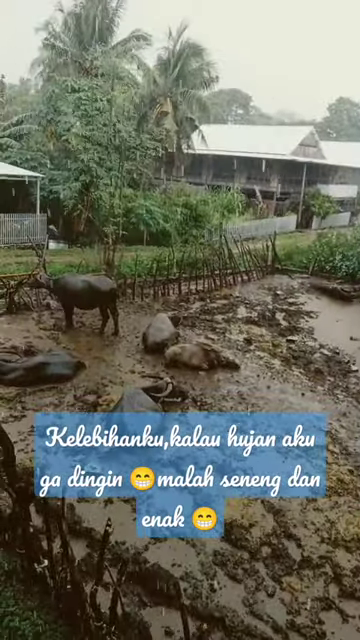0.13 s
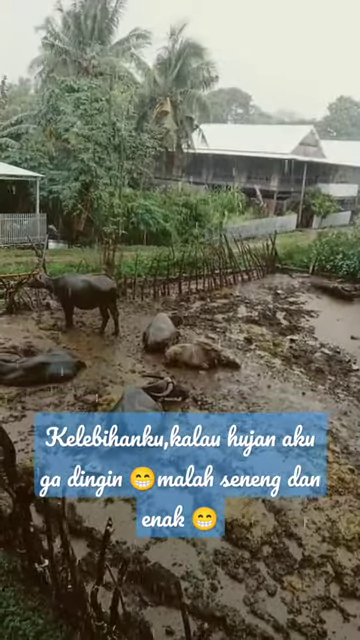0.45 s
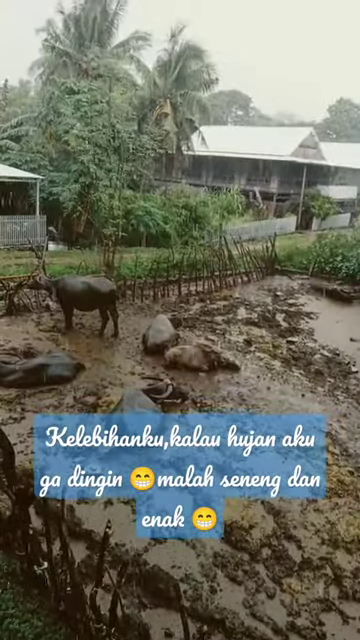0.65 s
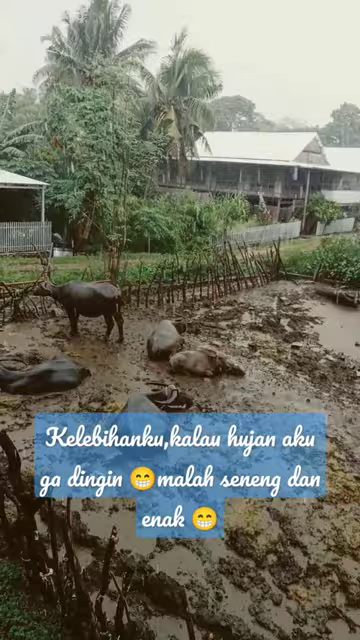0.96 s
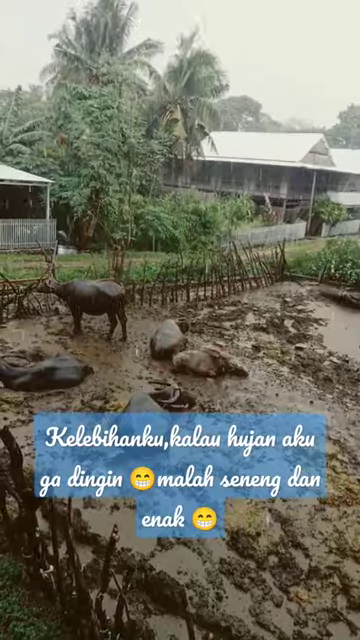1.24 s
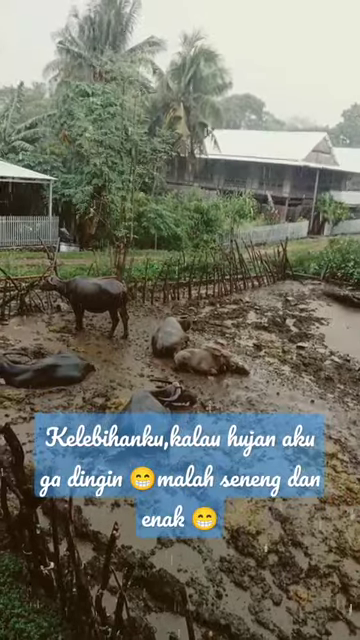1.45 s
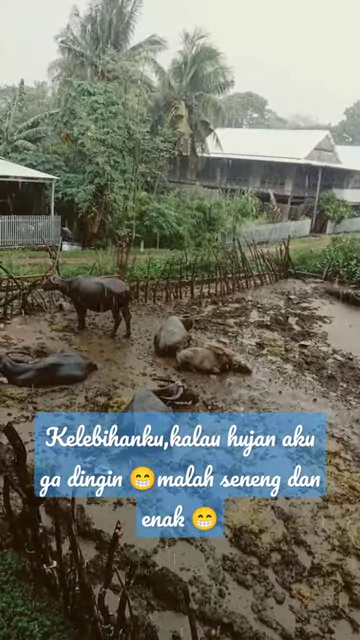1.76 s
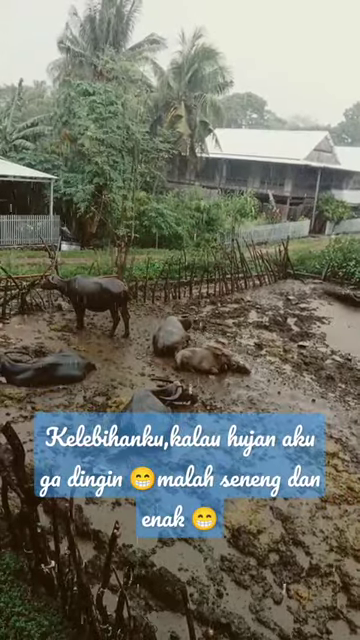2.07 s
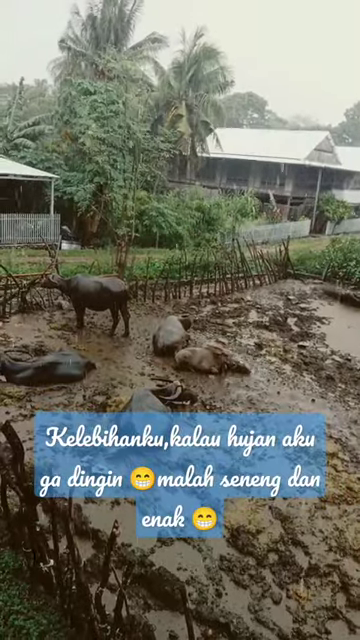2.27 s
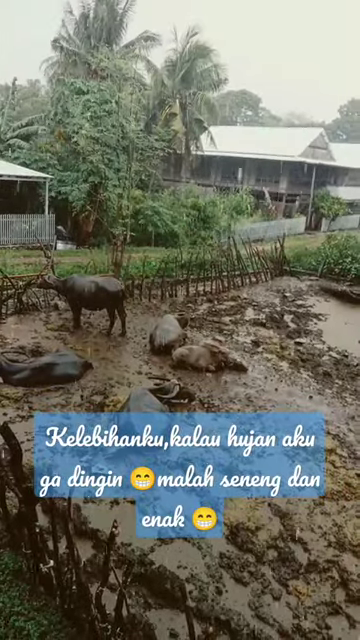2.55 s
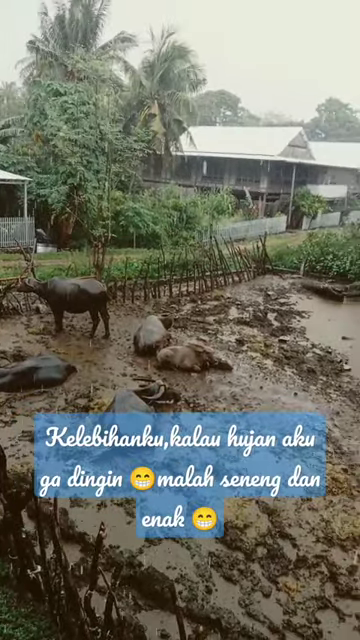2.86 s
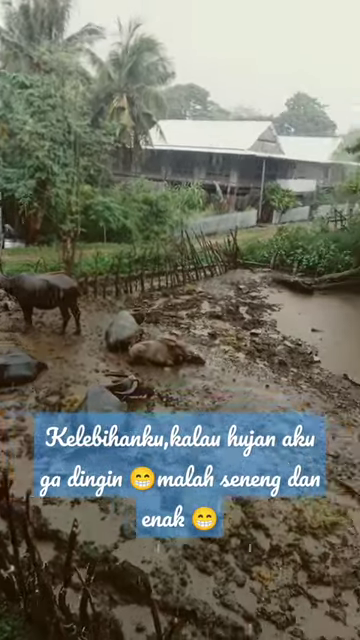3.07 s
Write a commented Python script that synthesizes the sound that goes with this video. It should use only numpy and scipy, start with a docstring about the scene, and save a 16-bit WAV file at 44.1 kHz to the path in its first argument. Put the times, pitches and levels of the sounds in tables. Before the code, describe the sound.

A steady downpour hisses over muddy ground, standing water and foliage outdoors. Throughout, big drips plop at uneven intervals near the sheltered phone microphone, along with an occasional sharper spatter.

```python
"""A steady wash of heavy rain on mud, puddles and leaves, heard from a shelter on a mono phone.
Countless far drops merge into the wash; nearer ones splash and ring as bubbles. These share one
colour, with a narrow ring near 1.26 kHz and a bright hump near 6.5 kHz.
Close by, fat drips thud dully and single drops spatter."""
import sys
import numpy as np
from scipy import signal
from scipy.fft import rfft, irfft, next_fast_len
from scipy.io import wavfile
from scipy.ndimage import uniform_filter1d

SR = 44100
rng = np.random.default_rng(int(sys.argv[2]) if len(sys.argv) > 2 else 0)


def store_wav(level_fs):
    """Save 16-bit WAV to argv[1]."""
    pcm = np.round(np.clip(np.atleast_2d(level_fs), -1, 1) * 32767)
    wavfile.write(sys.argv[1], SR, pcm.T.astype(np.int16))


N = 141561


def undb(db):
    return 10 ** (np.asarray(db) / 20)


def set_rms(x, db):
    return x * undb(db) / np.sqrt(np.mean(x ** 2))


def shaped(x, gain):
    """Filter x by gain(hz)."""
    size = next_fast_len(len(x) + 4096)
    hz = np.maximum(np.arange(size // 2 + 1) * SR / size, 1)
    return irfft(rfft(x, size) * gain(hz), size)[:len(x)]


def drift(per_s):
    """Smooth random drift, rms 1."""
    hold = int(SR / per_s)
    steps = np.repeat(rng.standard_normal(N // hold + 2), hold)
    return set_rms(uniform_filter1d(uniform_filter1d(steps, hold), hold)[:N], 0)


def add(out, start_s, sound):
    i = max(int(start_s * SR), 0)
    out[i:i + len(sound)] += sound[:max(N - i, 0)]


def drops(per_s, spread_db):
    """Random drops, many small, few large: (time [s], size [gain], pitch [0-1])."""
    when, rank, pitch = rng.random((int(per_s * N / SR), 3)).T
    size = undb(-spread_db * np.log(np.maximum(rank, .01)))
    return zip(when * N / SR, size, pitch)


# Rain spectrum at the phone: (frequency [Hz], gain [dB])
RAIN_SPECTRUM = [(25, -40), (45, -41), (75, -26), (140, -21), (240, -14.5), (330, -14), (400, -16),
                 (520, -12.5), (680, -8), (820, -7.5), (1050, -7), (1550, -6), (2000, -4), (2450, -2),
                 (2850, -4.5), (3300, -8.5), (4200, -13), (5000, -16), (5500, -13), (6100, -9.5),
                 (6650, -8.5), (7000, -12.5), (7450, -14), (8000, -22.5), (8600, -27.5), (9600, -24.5),
                 (10400, -25.5), (11300, -32), (12300, -38), (13200, -35.5), (14400, -36), (15200, -47)]


def colour(hz, ring_hz=1262, ring_width_hz=63, ring_db=8.5):
    """Gain of the broad rain spectrum and its narrow ring."""
    points_hz, points_db = np.array(RAIN_SPECTRUM).T
    broad = undb(np.interp(np.log(hz), np.log(points_hz), points_db))
    ring_power = 1 + (undb(ring_db) ** 2 - 1) / (1 + ((hz - ring_hz) / ring_width_hz) ** 2) ** 2
    return broad * np.sqrt(ring_power)


def wash(easing_db_per_s=.57):
    """Far drops merge: half-octave bands swell together, flicker alone and slacken, treble first."""
    out, t = np.zeros(N), np.arange(N) / SR
    swell_db = -.6 * drift(per_s=18)
    for centre_hz in 25 * 2 ** (np.arange(20) / 2):
        def band_gain(hz):
            return colour(hz) * np.cos(np.pi / 2 * np.clip(2 * np.log2(hz / centre_hz), -1, 1))
        band = shaped(rng.standard_normal(N), band_gain)
        easing_db = easing_db_per_s * t * centre_hz / (centre_hz + 1000)
        flicker_db = .5 + 3 / (1 + (centre_hz / 456) ** 2)  # lumpier bass: fewer drops reach that low
        out += band * undb(swell_db + flicker_db * drift(per_s=16) - easing_db)
    return set_rms(out, db=-35.5)


def splashes(decay_s=.0036):
    """Nearer drops slap mud and leaves, each a brief burst of spray."""
    power, t = np.zeros(N), np.arange(SR // 40) / SR
    spray = rng.standard_normal(N)
    for start_s, size, _ in drops(per_s=640, spread_db=.5):
        add(power, start_s, (size * np.exp(-t / decay_s)) ** 2)
    return set_rms(shaped(spray * np.sqrt(power), colour), db=-43.5)


def bubbles(low_hz=450, high_hz=9000, decay_cycles=56.5, rise_per_decay=.02005):
    """Drops on puddles trap bubbles that ring and rise a little in pitch."""
    out = np.zeros(N)
    for start_s, size, pitch in drops(per_s=640, spread_db=.77):
        hz = low_hz * (high_hz / low_hz) ** pitch
        age = np.arange(0, 5, hz / SR / decay_cycles)  # in decay times
        phase = 2 * np.pi * decay_cycles * age * (1 + rise_per_decay * age / 2)
        add(out, start_s, size * hz * np.exp(-age) * np.sin(phase))
    return set_rms(shaped(out, colour), db=-43)


# Swell contours of three rain bands, each used relative to its mean: (time [s], level [dB])
RUSH_CONTOUR = [(0, -41.5), (.36, -41.5), (.55, -38.5), (.6, -45.5), (.7, -40.5), (.83, -46), (.92, -40.5),
                (1.25, -40.5), (1.48, -39.5), (1.52, -42.5), (1.8, -40.5), (1.92, -46), (2.19, -42.5),
                (2.26, -38.5), (2.42, -44.5), (2.6, -42.5), (2.68, -43.5), (2.78, -44), (2.88, -41),
                (3.06, -42.5), (3.11, -58), (3.15, -45), (3.2, -38)]
RING_CONTOUR = [(0, -47), (.11, -36), (.2, -39), (.34, -40), (.53, -39), (.7, -44), (.83, -41),
                (.88, -36.5), (1.01, -37.5), (1.06, -40), (1.22, -41.5), (1.5, -41.5), (1.6, -37),
                (1.67, -44), (1.74, -40), (1.97, -42.5), (2.12, -42), (2.27, -39), (2.34, -46), (2.4, -41),
                (2.45, -46), (2.59, -38), (2.66, -37), (2.85, -40), (2.92, -41), (2.96, -38), (3.01, -45),
                (3.13, -41), (3.17, -30), (3.2, -45)]
CLATTER_CONTOUR = [(0, -36), (.28, -37), (.48, -36), (.55, -35.5), (.63, -34.5), (.68, -38.5), (.97, -37),
                   (1.03, -35.5), (1.3, -37), (1.36, -35.5), (1.42, -37.5), (1.69, -37.5), (1.75, -37),
                   (2.15, -38.5), (2.23, -36), (2.36, -40), (2.45, -35), (2.53, -39), (2.6, -34.5),
                   (2.67, -41.5), (2.75, -32.5), (2.81, -38.5), (2.92, -37.5), (2.98, -35.5), (3.11, -37),
                   (3.2, -35.5)]


def band_swells(rain):
    """The low rush, narrow ring and bright clatter rise and fall independently."""
    def swell(x, contour, centre_hz, half_width_hz, depth):
        times_s, levels_db = np.array(contour).T
        db = np.interp(np.arange(N) / SR, times_s, levels_db)
        band = shaped(x, lambda f: 1 / (1 + ((f - centre_hz) / half_width_hz) ** 4))
        return x + band * (undb(depth * (db - db.mean())) - 1)

    rain = swell(rain, RUSH_CONTOUR, centre_hz=500, half_width_hz=260, depth=.9)
    rain = swell(rain, RING_CONTOUR, centre_hz=1262, half_width_hz=63, depth=.68)
    return swell(rain, CLATTER_CONTOUR, centre_hz=2610, half_width_hz=340, depth=1.15)


def thud(hz, rise_s, glide_oct_per_s, splat_share=.35, splat_log_width=.38):
    """A soft wet blow swells, glides in pitch and dies, smeared by a noisy splat."""
    t = np.arange(0, 4 * rise_s, 1 / SR)
    envelope = (t / rise_s * np.exp(1 - t / rise_s)) ** 3
    pitch_hz = hz * 2 ** (glide_oct_per_s * (t - rise_s))
    tone = np.sin(2 * np.pi * np.cumsum(pitch_hz) / SR)
    noise = rng.standard_normal(SR // 4)
    splat = shaped(noise, lambda f: np.exp(-(np.log(f / hz) / splat_log_width) ** 2))
    splat = set_rms(np.resize(splat, len(t)), 0)
    return envelope * (np.sqrt(1 - splat_share) * tone + np.sqrt(splat_share / 2) * splat)


# Close fat drips: (time [s], pitch [Hz], envelope peak [dB], rise [s], glide [octaves/s])
FAT_DRIPS = [(.018, 111, -50, 0.022, 3), (.105, 456, -47, 0.014, 4), (.155, 882, -41.5, 0.023, -4.5),
             (.245, 85, -54, 0.027, 2), (.301, 603, -41, 0.017, 3.5), (.295, 344, -43.5, 0.032, 3),
             (.345, 583, -43, 0.017, -6), (.374, 760, -39.5, 0.015, 0), (.391, 247, -42.5, 0.018, -15),
             (.449, 346, -44, 0.02, 8), (.465, 236, -50, 0.029, -0.5), (.551, 79, -61, .03, 0),
             (.684, 114, -52, 0.025, 10), (.745, 187, -54, 0.032, 4), (.795, 243.5, -46, 0.037, 9),
             (.888, 476, -42, 0.018, 1), (.92, 332, -40.5, 0.014, 3), (.944, 551, -41.5, 0.015, 0),
             (1.036, 327, -48, .02, 3), (1.145, 328, -42, 0.021, -2.5), (1.322, 756, -51, 0.02, -5),
             (1.399, 183, -49.5, 0.026, -3), (1.447, 275, -42, 0.023, -1), (1.463, 400, -47, 0.012, 5),
             (1.517, 136.5, -48.5, 0.025, -10), (1.6, 80, -63, 0.02, 0), (1.74, 235, -50, 0.031, -5),
             (1.855, 91, -64, 0.027, 2), (1.94, 814, -39.5, 0.015, 9), (1.997, 200, -49, 0.019, -5),
             (2.008, 661, -37.5, 0.014, -7), (2.125, 160, -50, 0.018, 3), (2.22, 670, -42.5, 0.026, 2),
             (2.235, 271, -47, 0.025, 3), (2.319, 82, -60, 0.029, 5), (2.365, 856, -38, 0.012, -0.5),
             (2.448, 266, -46, .024, -2), (2.495, 531, -47, 0.019, -2.5), (2.578, 281, -44, 0.018, 19.5),
             (2.812, 498, -41, 0.027, -2.5), (2.843, 395, -47, 0.022, 3), (3.0, 198, -48.5, 0.037, 5),
             (3.041, 280, -41.5, 0.019, 11.5), (3.125, 649, -41, 0.022, 3)]


def drips(low_hz=130, high_hz=620, rise_cycles=3):
    """Fat drips thud and plop over a lighter random patter."""
    near, patter = np.zeros(N), np.zeros(N)
    for start_s, hz, db, rise_s, glide_oct_per_s in FAT_DRIPS:
        add(near, start_s, undb(db) * thud(hz, rise_s, glide_oct_per_s))
    for start_s, size, pitch in drops(per_s=35, spread_db=2.5):
        hz = low_hz * (high_hz / low_hz) ** pitch
        add(patter, start_s, size * hz * thud(hz, rise_cycles / hz, glide_oct_per_s=4))
    return near + set_rms(patter, db=-58.5)


# Close spatters: (time [s], centre [Hz], width [Hz], peak rms [dB], decay [s])
SPATTERS = [(0.017, 3900, 1200, -40, .008), (0.849, 10500, 3000, -55, .008), (.9, 11500, 5000, -61, .008),
            (1.016, 4700, 1800, -43, .004), (1.713, 7900, 1400, -51, .008),
            (1.939, 5750, 1200, -42, 0.0067), (1.967, 12000, 4000, -61, .006),
            (2.256, 1290, 200, -35.5, .012), (2.295, 695, 300, -40, .014), (2.56, 6540, 1600, -33, 0.011),
            (2.576, 1270, 160, -36, 0.017), (2.592, 2850, 900, -40, .009), (2.592, 10500, 7000, -53, .014)]


def spatters(attack_s=.002):
    """Single close drops burst into spray, each in its own band."""
    out, t = np.zeros(N), np.arange(SR // 10) / SR
    for start_s, hz, width_hz, db, decay_s in SPATTERS:
        envelope = (1 - np.exp(-t / attack_s)) * np.exp(-t / decay_s)
        spray = shaped(rng.standard_normal(len(t)), lambda f: 1 / (1 + (2 * (f - hz) / width_hz) ** 4))
        add(out, start_s, set_rms(spray, db) * envelope / envelope.max())
    return out


def scene():
    """Swelling rain with close drops on top, the same in both ears."""
    rain = band_swells(wash() + splashes() + bubbles())
    return np.tile(rain + drips() + spatters(), (2, 1))


def record(dry):
    """The phone cuts the top treble."""
    cutoff_hz = 15050
    return signal.sosfilt(signal.ellip(10, .1, 70, cutoff_hz, fs=SR, output="sos"), dry)


dry = scene()
out = record(dry)
store_wav(out)
```